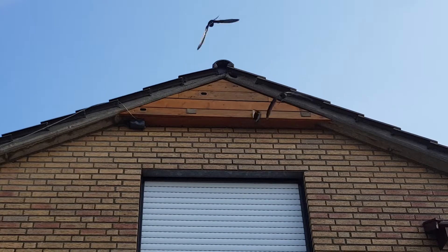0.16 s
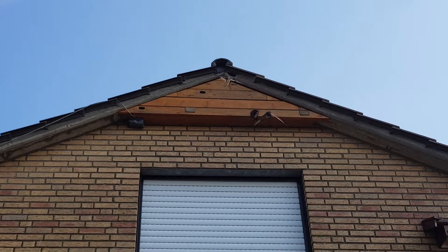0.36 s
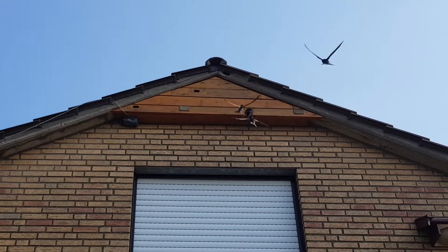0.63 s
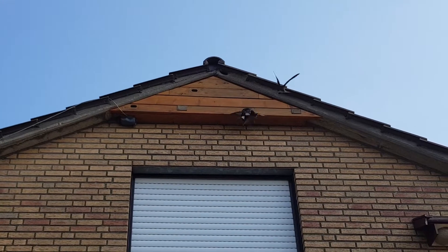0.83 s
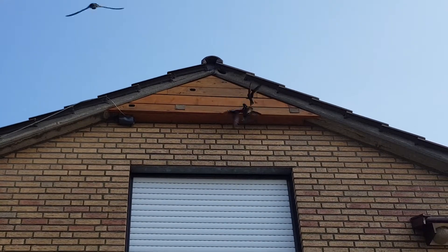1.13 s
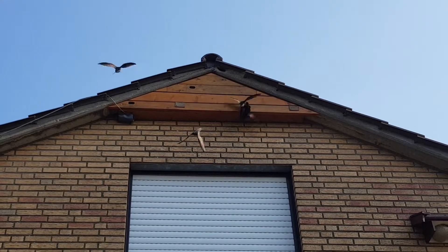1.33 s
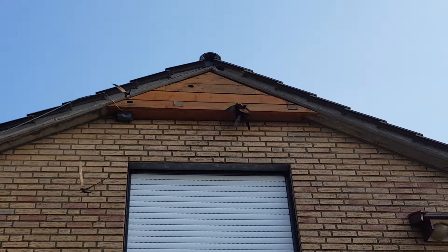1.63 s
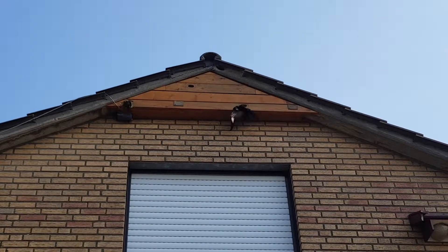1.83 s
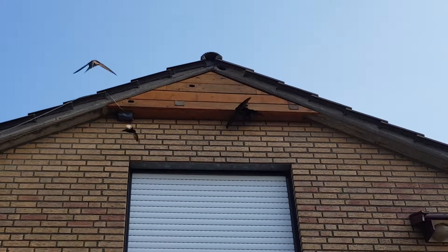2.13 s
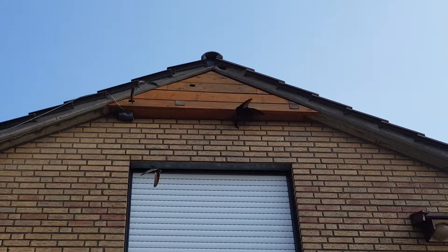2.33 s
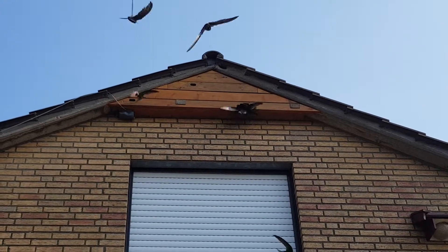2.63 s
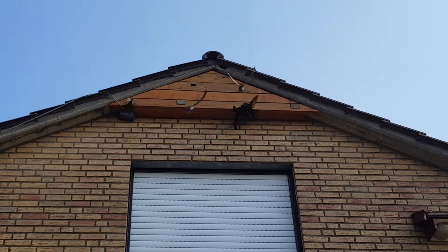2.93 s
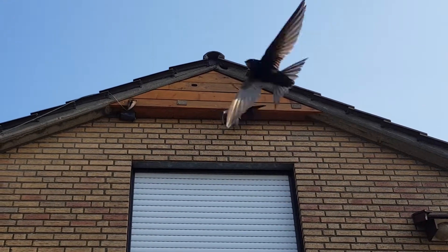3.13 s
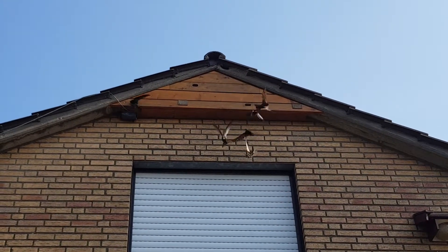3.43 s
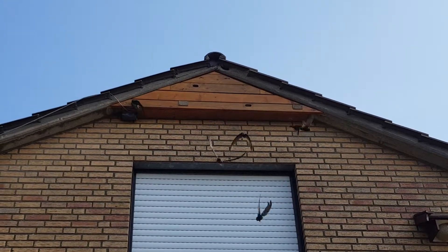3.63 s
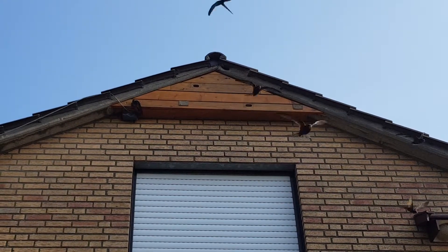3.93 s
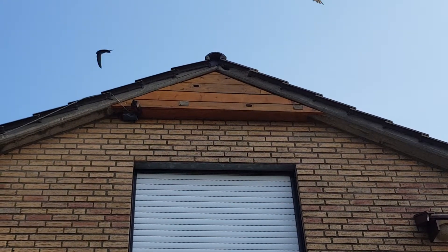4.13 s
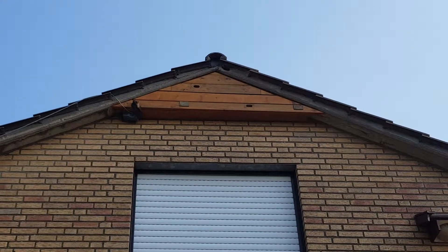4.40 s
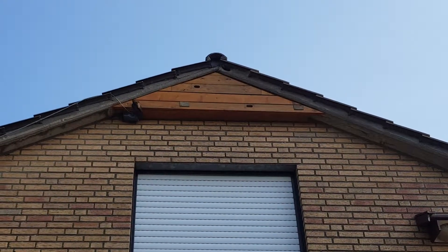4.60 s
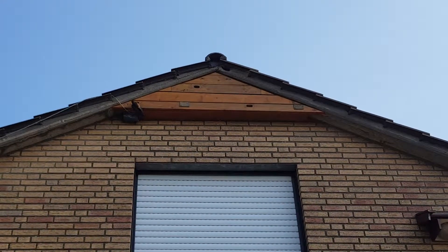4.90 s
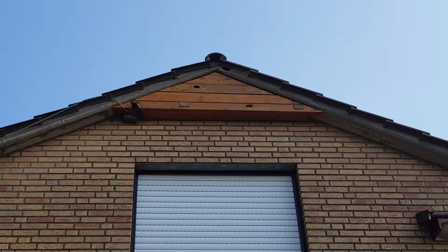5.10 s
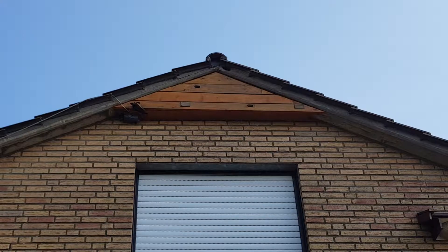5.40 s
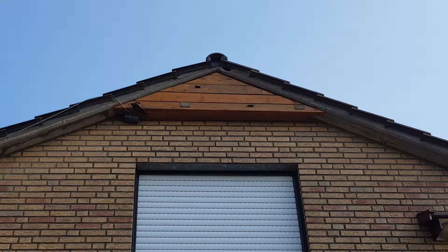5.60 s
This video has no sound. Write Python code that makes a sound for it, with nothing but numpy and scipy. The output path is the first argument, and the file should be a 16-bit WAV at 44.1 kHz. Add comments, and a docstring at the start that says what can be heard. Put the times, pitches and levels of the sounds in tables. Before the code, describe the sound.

Piercing, raspy swift screams erupt after a quiet second of dove coos and a finch's wheeze, then give way to faint garden birds.

```python
"""A dove's low coos and faint songbird notes open the scene, by a house with a brick gable and wooden eaves.
Grainy puffs of noise are wings brushing the eaves; decaying low tones are bodies bumping the boards.
A finch's long falling wheeze, a train of quick glides, follows; then swifts scream in overlapping calls,
curving whistles chopped by a fast trill, joined later by slow stutters. Clucks and a rapid twitter come
amid these, and a low outdoor rumble with a faint hiss, made of filtered noise, lasts throughout."""
import sys
import numpy as np
from scipy import signal
from scipy.fft import rfft, irfft
from scipy.io import wavfile
from scipy.ndimage import map_coordinates

SR = 44100
rng = np.random.default_rng(int(sys.argv[2]) if len(sys.argv) > 2 else 0)


def digitize_waveform(pressure):
    """Quantize a signal to 16-bit integers and store it at the path in sys.argv[1].

    Rows of a 2-D input are taken as channels; values are limited to [-1, 1].
    """
    field = np.atleast_2d(pressure).T
    bounded = np.clip(field, -1, 1)
    quanta = np.round(bounded * 32767).astype(np.int16)
    wavfile.write(sys.argv[1], SR, quanta)


N = 253575  # length in samples


def swifts():
    """Superposition: screams and stutters from their own directions share a throat resonance and an echo."""
    # screams, with the curve of pitch, the level change after the hold and the harshness of each:
    # (start_s, length_s, scoop_hz, opening_hz, middle_hz, closing_hz, level_db, attack_s, hold_s, fall_db,
    #  first_rasp 0-1, break_s, trill_per_s, left_right_db, octave_db, odd_partials_db)
    scream_rows = [ (1.012, 0.48, 488, 5988, 6403, 7546, -20, 0.045, .095, -9.5, 0.14, 0.18, 294, 6, -19.5, -16.5),
                   (1.68, 0.51, 409, 5786, 6770, 6114, -22.5, 0.02, 0.25, -8, .1, 0.32, 330, 5, -29, -26.5),
                   (2.165, 0.095, 22, 6650, 6310, 6330, -31, 0.059, 0.049, 4, 1, .05, 280, 7, -27, -34.5),
                   (2.215, .32, 608, 4762, 5194, 5104, -19.5, 0.15, 0.32, 2, 0.15, 0.29, 300, 7, -23.5, -21.5),
                   (2.444, 0.43, 250.5, 5437, 6076, 6180, -23.5, 0.034, 0.076, -3, 0.44, 0.15, 236, 7, -20, -7.5),
                   (2.644, 0.37, 797.5, 5950, 6103, 5880, -29, 0.051, 0.23, -2.5, 0.3, .35, 200, 8, -28.5, -21),
                   (3.031, .36, 1248, 5703, 5770, 5370, -23.5, 0.024, .28, -6.5, 0.39, .3, 294, 8.5, -18, -11.5),
                   (3.484, 0.5, 198, 6050, 7087, 6880, -19, 0.022, 0.23, -9.5, 0, 0.24, 89, 2, -22.5, -39),
                   (3.476, .55, 1246, 5918, 6265, 5693, -14.5, .07, 0.17, -5, .06, .44, 330, 6, -25.5, -45.5),
                   (3.741, 0.33, 1604.5, 5923, 5476, 5424, -26, 0.024, 0.12, -0.5, 0.45, 0.29, 224, 7, -14, -3.5),
                   (4.036, 0.87, 782, 5757, 5952, 5975, -17, 0.023, 0.611, -13, .36, .6, 316, 2.5, -17, -19.5),
                   (4.323, .26, 648.5, 6570, 6980, 7280, -16.5, 0.024, 0.069, -8, 0.3, 0.23, 290, 1, -18.5, -29),
                   (4.369, 0.11, 291.5, 6330, 6220, 6300, -23.5, 0.011, .06, -2, 0.61, 0.045, 250, 1, -23.5, -30),
                   (4.555, 0.39, -9, 7500, 7660, 7520, -52.5, 0.037, 0.15, 0, 1, .05, 340, 6, -25, -30), ]
    # slow stutters: (start_s, length_s, first_hz, last_hz, level_db, left_right_db, octave_db)
    stutter_rows = [ (2.274, .095, 6460, 5900, -31.5, 7, -50), (2.524, 0.099, 5224, 5100, -28, 9.5, -18),
                    (3.001, 0.026, 5810, 5600, -28, 11, -26), (3.37, 0.11, 5750, 5280, -31, 8, -20.5),
                    (3.977, 0.071, 6785, 6100, -30, 7, -25.5), (4.563, 0.16, 6635, 5750, -29, 1.5, -23.5),
                    (4.903, .12, 5955, 4753, -36.5, 3.5, -22.5), ]
    # colour of beak and throat: (frequency_hz, gain_db)
    throat = [(2500, -6.5), (4200, -2), (6000, -3), (8000, 4), (9800, 3), (11700, 11.5), (13500, -1.5),
              (16000, -2.5)]
    wet_db, treble_lean_db = -12, 6
    calls = np.zeros((2, N))
    for start, *row in scream_rows:
        add(calls, start, scream(*row))
    for start, *row in stutter_rows:
        add(calls, start, stutter(*row))
    left, right = coloured(calls + amp(wet_db) * yard(calls.mean(0)), throat)
    # the treble leans to the right
    left = coloured(left, [(7000, 0.0011), (11000, -treble_lean_db / 2)])
    right = coloured(right, [(7000, 0.0011), (11000, treble_lean_db / 2)])
    return np.array([left, right])


def scream(length, scoop_hz, opening_hz, middle_hz, closing_hz, level_db, attack, hold, fall_db,
           first_rasp, break_s, trill_rate, pan_db, octave_db, odd_db):
    """Frequency modulation: a whistle settles onto a parabola of pitch, then breaks into full rasp."""
    scoop_s, release_s = .027, .04
    fall_s, break_width_s = 0.0092, 0.023  # how gradually the level changes and the voice breaks
    tire_db_per_s, trill_sag = 13, 69  # steady loss of level; pulses per second lost each second
    u = np.arange(0, length, 1 / SR)
    parabola = np.polyfit([0, 1, 2], [opening_hz, middle_hz, closing_hz], 2)
    hz = np.polyval(parabola, 2 * u / length) - scoop_hz * np.exp(-u / scoop_s)
    fallen = soft_step(u - hold, 2 * fall_s)
    broken = soft_step(u - break_s, 2 * break_width_s)
    effort_db = level_db + fall_db * fallen - tire_db_per_s * u
    rasp = first_rasp + (1 - first_rasp) * broken
    voice = syrinx(u, hz, effort_db, rasp, trill_rate - trill_sag * u, chop=0.59, swing_hz=267,
                   octave_db=octave_db, odd_db=odd_db)
    envelope = ramp(u, attack) ** 0.67 * ramp(length - u, release_s)
    return sides(pan_db) * gable(voice * envelope)


def stutter(length, first_hz, last_hz, level_db, pan_db, octave_db):
    """Amplitude modulation: at a slow rate the trill becomes separate, deep pulses as the pitch drops."""
    u = np.arange(0, length, 1 / SR)
    hz = first_hz + (last_hz - first_hz) * (u / length) ** 1.4
    voice = syrinx(u, hz, level_db, rasp=.6, rate=79, chop=2.0, swing_hz=600,
                   octave_db=octave_db, odd_db=-20)
    return sides(pan_db) * gable(voice * swell(u / length))


def syrinx(u, hz, level_db, rasp, rate, chop, swing_hz, octave_db, odd_db):
    """Coupled modulation: an oscillator chops a whistle on the second partial and swings its pitch."""
    jitter_hz, waver_hz, drift_hz = 260, 40, 22
    skirt_db, hiss_db, flutter_db = -17.98, -44, 1.44
    odd_fade_db_per_s, attack_db, attack_decay_s = 20, 3, 0.092
    n = len(u)
    rasp = np.clip(rasp * (1 + .18 * wander(n, 30)), 0, 1)  # the harshness flickers
    trill = 2 * np.pi * np.cumsum(rate * (1 + .035 * wander(n, 100))) / SR
    depth = chop * np.sqrt(rasp)
    pulses = np.exp(depth * np.cos(trill)) / np.sqrt(np.i0(2 * depth))  # rms stays near 1

    # the pitch slides down through each pulse, and grows unsteady as the voice turns harsh
    hz = hz - swing_hz * rasp * np.sin(trill)
    hz = hz + jitter_hz * rasp ** 3 * wander(n, 660)
    hz = hz + waver_hz * wander(n, 60) + drift_hz * wander(n, 13.7)
    phase = np.pi * np.cumsum(hz) / SR  # phase of the first partial, an octave below the whistle

    # the trill splits the octave into a fan of lines
    fan = (0.6016 + 0.94 * rasp) * np.sin(trill)
    octave = amp(octave_db) * np.sin(4 * phase + fan + .2 * wander(n, 500))

    # the odd partials are fuzzy, die away through the call and vanish in a harsh voice
    fanned = phase + 0.24 * np.sqrt(rasp) * np.sin(trill)
    odd = amp(-10) * np.sin(fanned) + np.sin(3 * fanned) + amp(-5) * np.sin(5 * fanned)
    odd *= amp(odd_db - odd_fade_db_per_s * u)
    odd *= (1 - rasp) ** 2 * (1 + 0.65 * wander(n, 734))

    bright = amp(attack_db * np.exp(-u / attack_decay_s))  # overtones get a boost at the onset
    tone = np.sin(2 * phase) + bright * (octave + odd)
    voice = np.sqrt(2) * tone * (1 + amp(skirt_db) * rasp * wander(n, 2200))
    voice += amp(hiss_db) * (1 + 20 * rasp ** 2) * above(rng.standard_normal(n), 2600)
    return amp(level_db + flutter_db * wander(n, 48)) * pulses * voice * fade(u, 0.0031)


def gable(x):
    """Early reflection: wall and eaves return the call with drifting delays, different at each ear."""
    echo_db, delay_s, drift_s = -8, .005, .0002
    x = np.pad(x, (0, SR // 20))
    size = len(x)
    at = np.arange(size)
    ears = []
    for ear in (-1, 1):
        direct_lag = ear * (9.79e-6 + 11e-6 * wander(size, 8))
        heard = 0.83 * map_coordinates(x, [at - direct_lag * SR], order=3)
        for k in range(1, 4):
            lag = k * delay_s * (.5 + rng.random()) + drift_s * wander(size, 2.327)
            heard += amp(echo_db) / k * map_coordinates(x, [at - lag * SR], order=3)
        ears.append(heard)
    return np.array(ears)


def wings():
    """Friction and impact: feathers scrape the boards in noise puffs; bumps ring as damped low tones."""
    # wing strokes against the eaves: (start_s, level_db, decay_s)
    flap_rows = [(0.103, -55.5, 0.056), (0.843, -62.5, 0.084), (1.323, -61.5, 0.056), (1.369, -63, 0.031),
                 (1.391, -42.5, 0.012), (1.435, -77, 0.011), (2.559, -39.5, 0.026), (2.576, -57, 0.017),
                 (2.862, -56.5, 0.075), (3.22, -45.5, 0.021), (3.24, -42, 0.012), (3.288, -41, 0.013),
                 (3.332, -46, 0.014), (3.377, -39.5, 0.011), (3.405, -45, 0.02), (3.45, -49.5, 0.014)]
    # colour of the strokes: (frequency_hz, gain_db)
    flap_colour = [(60, -1), (150, -10.5), (350, -1.5), (700, -2.5), (1200, -5.5), (2500, -3.5),
                   (5000, -3.5), (10000, -11.5), (16000, -12.5)]
    # soft thuds of a body on the boards: (start_s, level_db, pitch_hz)
    thud_rows = [(0.093, -45, 117), (1.848, -50.5, 192), (2.872, -48, 195)]
    wet_db = -10
    t = np.arange(SR // 4) / SR
    push, bumps = np.zeros(N), np.zeros(N)
    for start, level_db, decay in flap_rows:
        add(push, start, amp(level_db) * (1 - np.exp(-t / 0.0005)) * np.exp(-t / decay))
    for start, level_db, hz in thud_rows:
        envelope = (1 - np.exp(-t / 0.0034)) * np.exp(-t / 0.015)
        phase = 2 * np.pi * np.cumsum(hz * (1 + 0.22 * wander(len(t), 79))) / SR
        add(bumps, start, amp(level_db) * envelope * 2 * np.sin(phase))
    # mostly shared noise, with a little of its own on each side
    grains = rng.standard_normal(N) + 0.17 * rng.standard_normal((2, N))
    grains *= amp(1.3 * wander(N, 400))
    puffs = push * unit(coloured(grains, flap_colour))
    return puffs + amp(wet_db) * yard(puffs) + bumps


def garden():
    """Direct-to-reverberant ratio: dove and songbirds sound farther off by a larger share of echo."""
    # notes of distant songbirds, level before song_db: (start_s, length_s, first_hz, last_hz, level_db)
    whistle_rows = [ (0, 0.12, 2393, 2500, -67), (0, 0.015, 1655, 1730, -62.5), (.06, .06, 4090, 4150, -62),
                    (1.57, 0.25, 1874, 1772, -66.5), (1.77, 0.027, 3350, 3400, -51),
                    (1.92, 0.17, 3370, 3600, -56.5), (1.92, .13, 2200, 2300, -56),
                    (2.24, .17, 1894, 1900, -60.5), (2.5, 0.27, 2120, 2150, -66.5),
                    (3.74, .18, 2410, 2320, -62.5), (4.08, 0.12, 2700, 2900, -56),
                    (4.91, 0.068, 1670, 2200, -69), (5.46, 0.12, 1663, 2000, -76),
                    (5.66, 0.1, 1650, 2250, -69.5), ]
    # short, nasal clucks of another bird: (start_s, length_s, first_hz, last_hz, level_db)
    cluck_rows = [(2.113, 0.0338, 1180, 1153, -55), (2.196, 0.039, 1182, 1144, -50.5)]
    dove_db, dove_pan_db, dove_wet_db = -1.0, 4, -7
    song_db, song_pan_db, song_wet_db = -3, .7, -3
    dove = coos()
    song = notes(whistle_rows, waver=0.035, overtone_db=-10.5) + sweeps()
    clucks = notes(cluck_rows, waver=0.034, overtone_db=-11)
    direct = amp(dove_db) * sides(dove_pan_db) * dove
    direct = direct + sides(song_pan_db) * (amp(song_db) * song + clucks)
    return direct + yard(amp(dove_wet_db) * dove + amp(song_wet_db) * song)  # the clucks stay dry


def coos():
    """Register change: each coo climbs to its top, holds, then drops into a softer low register."""
    # dove notes, level before the dove's overall gain: (start_s, rise_s, hold_s, tail_s, top_hz, level_db)
    coo_rows = [ (0.016, 0.071, 0.078, .2, 575.4, -48), (0.832, 0.028, 0.031, 0.079, 541, -50.5),
                (1.692, 0.083, 0.11, 0.023, 587, -49.5), (2.056, .045, 0.069, 0.57, 535.6, -46.5),
                (2.879, 0.042, 0.045, 0.063, 516.6, -52.5), (3.49, 0.059, 0.15, 0.035, 596, -50.5),
                (3.864, .055, .12, 0.27, 573, -47.5), (4.719, 0.028, 0.05, 0.084, 508, -55.5),
                (5.437, 0.087, 0.11, 0.035, 580.3, -51), ]
    first_share = .85  # first pitch as a share of the top
    low_hz, sag_hz_per_s = 506.4, 130
    drop_s, low_db, fade_db_per_s = 0.018, -7.5, 37
    out = np.zeros(N)
    for start, rise, hold, tail, top_hz, level_db in coo_rows:
        u = np.arange(0, rise + hold + tail, 1 / SR)
        late = np.maximum(u - rise - hold, 0)
        low = ramp(late, drop_s)
        high_pitch = top_hz * (first_share + (1 - first_share) * ramp(u, rise) ** 2)
        high_pitch -= sag_hz_per_s * np.maximum(u - rise, 0)
        low_pitch = low_hz - sag_hz_per_s * late
        hz = (1 - low) * high_pitch + low * low_pitch
        gain = amp(level_db + low_db * low - fade_db_per_s * late)
        gain *= ramp(u, rise) ** 0.97 * fade(u, 0.0052)
        add(out, start, gain * pure(hz, waver=0.023, overtone_db=-34.0))
    return out


def notes(rows, waver, overtone_db):
    """Linear chirp: short notes swell and fade while they glide from one pitch to another."""
    out = np.zeros(N)
    for start, length, first_hz, last_hz, level_db in rows:
        x = np.arange(0, length, 1 / SR) / length
        hz = first_hz + (last_hz - first_hz) * x
        add(out, start, amp(level_db) * swell(x) * pure(hz, waver, overtone_db))
    return out


def sweeps():
    """Repetition rate: quick glides fuse into a buzz when fast and are heard as a twitter when slow."""
    # a few rising chips, a finch's long falling wheeze, a rapid twitter; level before the song's overall gain:
    # (start_s, length_s, first_hz, last_hz, level_db, attack_s, release_s, glides_per_s, sweep_hz,
    #  unevenness 0-1)
    train_rows = [ (0.077, 0.066, 4460, 4510, -46.5, 0.053, 0.046, 51, 1347, 0.2),
                  (.63, 1.223, 4020, 2603, -50, .17, 0.6, 175, -1900, 0.11),
                  (2.852, .9, 3276, 3192, -54, .08, .04, 37, -1300, .12), ]
    bend_at, bend_width = .71, .15  # where the pitch shifts and how gradually (shares of the train)
    blur_hz = 80
    out = np.zeros(N)
    for start, length, first_hz, last_hz, level_db, attack, release, rate, sweep_hz, uneven in train_rows:
        u = np.arange(0, length, 1 / SR)
        centre_hz = first_hz + (last_hz - first_hz) * soft_step(u / length - bend_at, bend_width)
        gain = amp(level_db) * (ramp(u, attack) * ramp(length - u, release)) ** 1.1
        cycle = np.cumsum(rate * (1 + uneven * wander(len(u), 30))) / SR % 1  # place within each glide
        hz = centre_hz + sweep_hz * (cycle - .5) + blur_hz * wander(len(u), 783)
        phase = 2 * np.pi * np.cumsum(hz) / SR
        add(out, start, 2 * gain * np.sin(np.pi * cycle) ** 2 * np.sin(phase))
    return out


def pure(hz, waver, overtone_db):
    """Harmonic series: a slightly wavering fundamental with only its second harmonic."""
    phase = 2 * np.pi * np.cumsum(hz * (1 + waver * wander(len(hz), 170))) / SR
    return np.sqrt(2) * (np.sin(phase) + amp(overtone_db) * np.sin(2 * phase))


def air():
    """Partial coherence: a low outdoor rumble under a faint hiss, its likeness between sides set by pitch."""
    # spectrum of the noise before scaling: (frequency_hz, level_db per Hz)
    air_colour = [(20, -23), (45, -2.5), (70, 1), (125, -5.5), (175, -17.5), (300, -19), (500, -23),
                  (1160, -30.5), (2200, -33), (4500, -36.5), (7000, -37.5), (15000, -33.5)]
    # likeness of left and right: (frequency_hz, coherence 0-1)
    likeness = [(30, 0.98), (150, 0.9), (500, 0.76), (1500, 1), (6000, 0.1), (16000, .1)]
    level_db = -60.5
    same = np.clip(read(likeness, np.fft.rfftfreq(N, 1 / SR)), -1, 1)
    a, b = rfft(rng.standard_normal((2, N)))
    pair = irfft(np.array([a, same * a + np.sqrt(1 - same ** 2) * b]), N)
    return amp(level_db) * unit(coloured(pair, air_colour))


def yard(x):
    """Reverberation: houses and gardens return sparse random echoes that decay at their own rate per band."""
    # reverberation time: (frequency_hz, t60_s)
    decay_times = [(200, 0.25), (600, 0.63), (2000, 0.63), (6000, 0.39), (12000, 0.33), (16000, 0.038)]
    taps_per_s, gap_s = 3000, .012
    taps = rng.standard_normal((2, SR)) * (rng.random((2, SR)) < taps_per_s / SR)
    taps = taps * (np.arange(SR) > gap_s * SR)
    hz, t, z = signal.stft(taps, SR, nperseg=256)
    decay = amp(-60 * t / read(decay_times, hz)[:, None])
    tail = signal.istft(z * decay, SR, nperseg=256)[1]
    return signal.fftconvolve(np.atleast_2d(x), tail / np.linalg.norm(tail[0]), axes=1)[:, :N]


def wander(size, hz):
    """Band-limited noise: smooth chance of rms 1, fading out above about hz and repeating each second."""
    f = np.arange(SR // 8)
    spectrum = rng.standard_normal(2 * len(f)).view(complex) * np.exp(-np.minimum(f / hz, 10) ** 2)
    return np.resize(unit(irfft(spectrum, SR)), size)


def coloured(x, points):
    """Linear filtering: shapes the spectrum by a table of (frequency_hz, gain_db)."""
    size = x.shape[-1]
    return irfft(rfft(x) * amp(read(points, np.fft.rfftfreq(size, 1 / SR))), size)


def above(x, hz):
    """High-pass filtering: takes out the lows."""
    return signal.sosfilt(signal.butter(2, hz, "high", fs=SR, output="sos"), x)


def sides(db):
    """Level difference between the ears: left and right gains of constant total power."""
    return unit(amp(np.array([[db], [-db]]) / 2))


def fade(t, edge):
    """Raised-cosine envelope: a soft start and stop."""
    return np.sin(np.pi / 2 * np.clip(np.minimum(t - t[0], t[-1] - t) / edge, 0, 1)) ** 2


def ramp(u, length):
    """Linear envelope: climbs from 0 to 1 over length seconds."""
    return np.clip(u / max(length, 1e-4), 0, 1)


def swell(x):
    """Half-sine envelope: a rounded rise and fall as x runs from 0 to 1."""
    return np.sqrt(abs(np.sin(np.pi * x)))


def soft_step(x, width):
    """Sigmoid transition: passes smoothly from 0 to 1 around x = 0."""
    return (1 + np.tanh(x / width)) / 2


def amp(db):
    """Logarithmic level: decibels to gain."""
    return 10 ** (np.asarray(db) / 20)


def unit(x):
    """Normalisation: scales to rms 1."""
    return x / np.sqrt(np.mean(x ** 2) + 1e-20)


def read(points, hz):
    """Interpolation: reads a table of (frequency_hz, value) on a log-frequency axis."""
    f, value = np.transpose(points)
    return np.interp(np.log(hz + 1), np.log(f), value)


def add(mix, s, sound):
    """Superposition: mixes a sound in at time s."""
    part = mix[..., max(round(s * SR), 0):][..., :sound.shape[-1]]
    part += sound[..., :part.shape[-1]]


def scene():
    """Superposition: swifts and their wings in front, garden birds and air behind."""
    return swifts() + wings() + garden() + air()


def record(dry):
    """Band limiting: a steep low-pass takes out everything above the edge."""
    edge_hz = 15900
    low_pass = signal.firwin(511, edge_hz, window=("kaiser", 9), fs=SR)
    return signal.oaconvolve(dry, low_pass[None], "same")


dry = scene()
out = record(dry)
digitize_waveform(out)
```